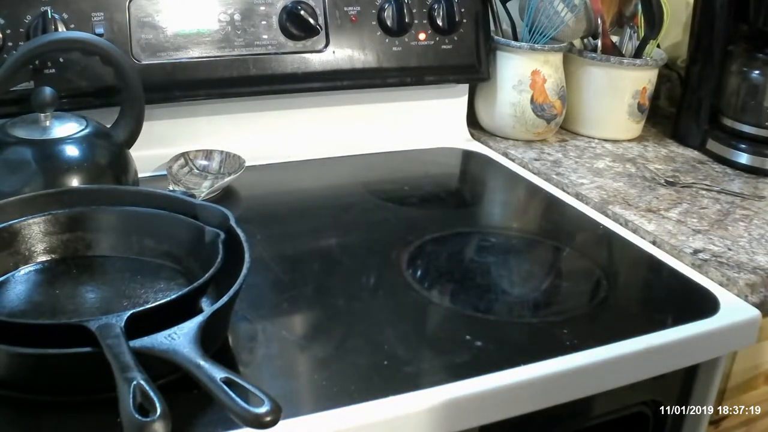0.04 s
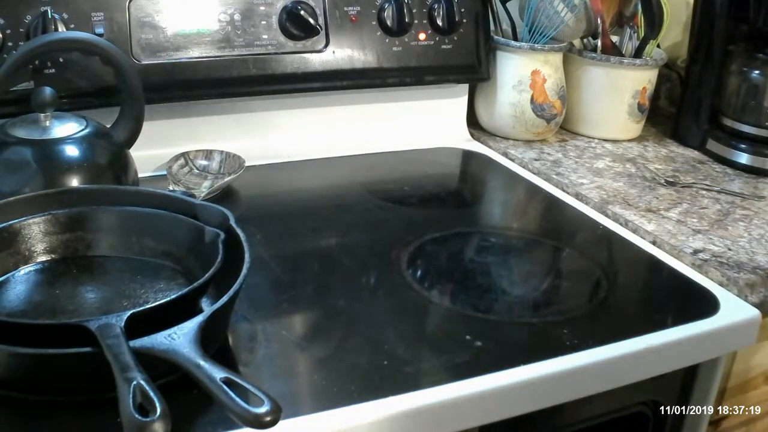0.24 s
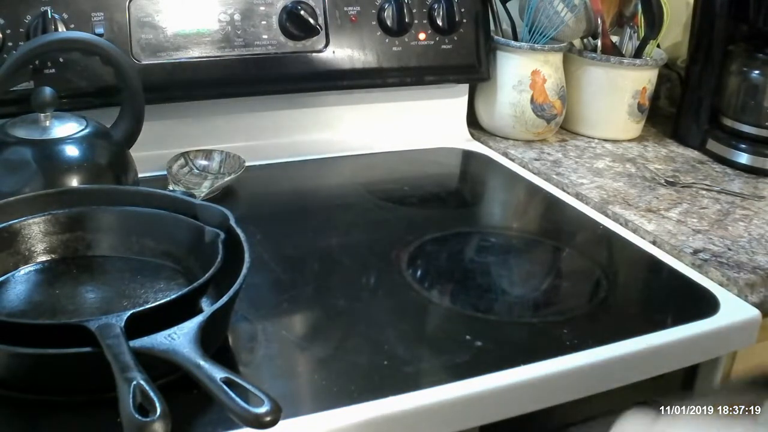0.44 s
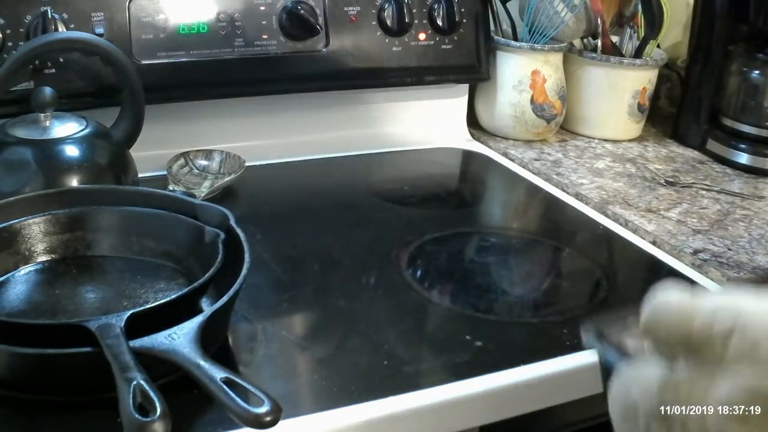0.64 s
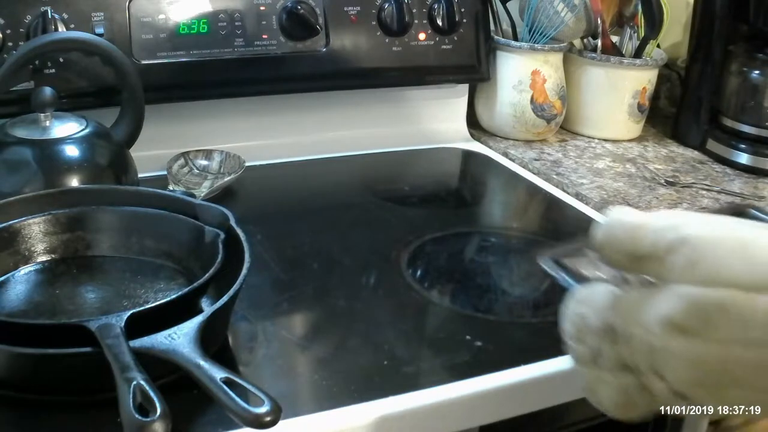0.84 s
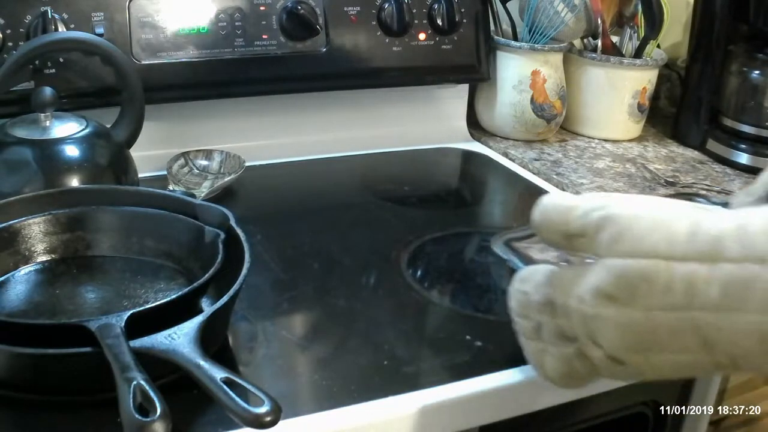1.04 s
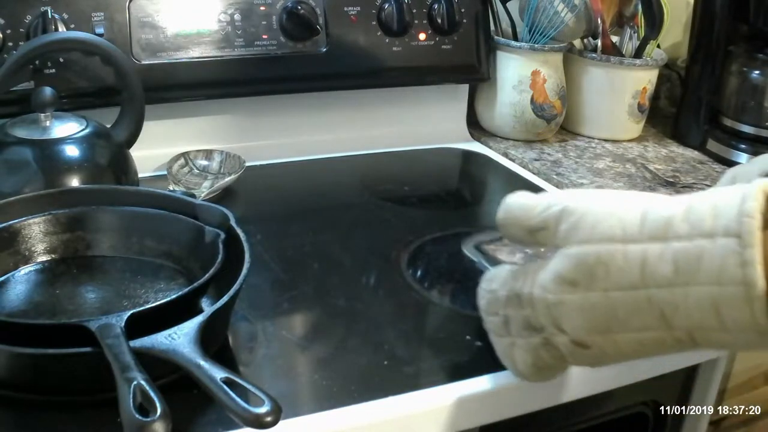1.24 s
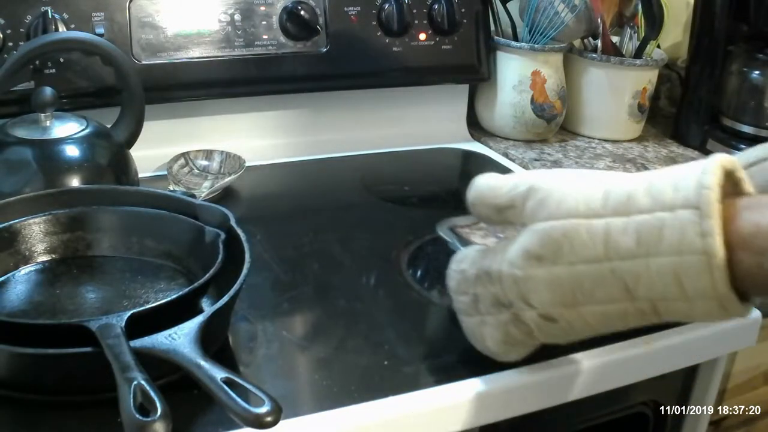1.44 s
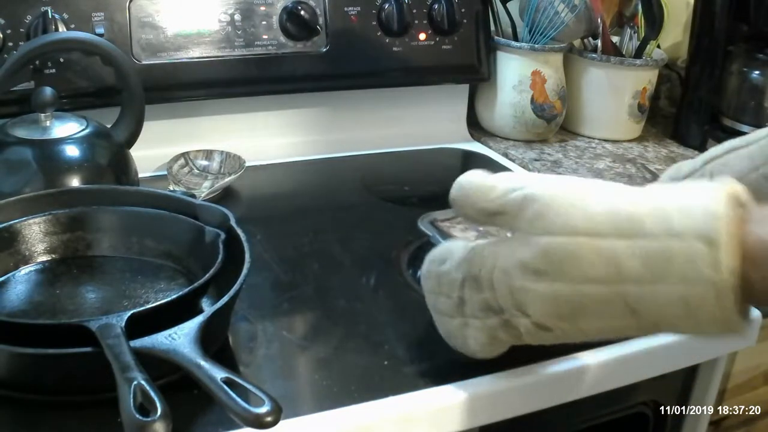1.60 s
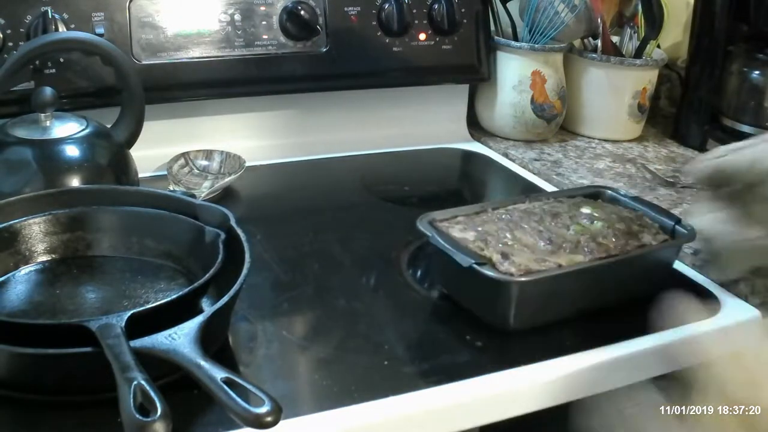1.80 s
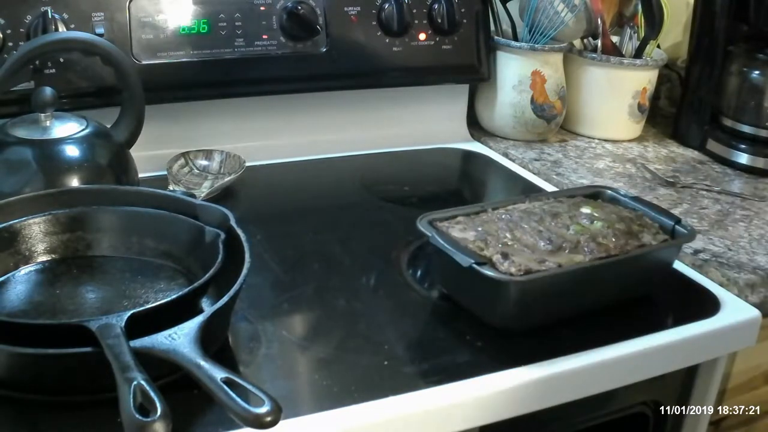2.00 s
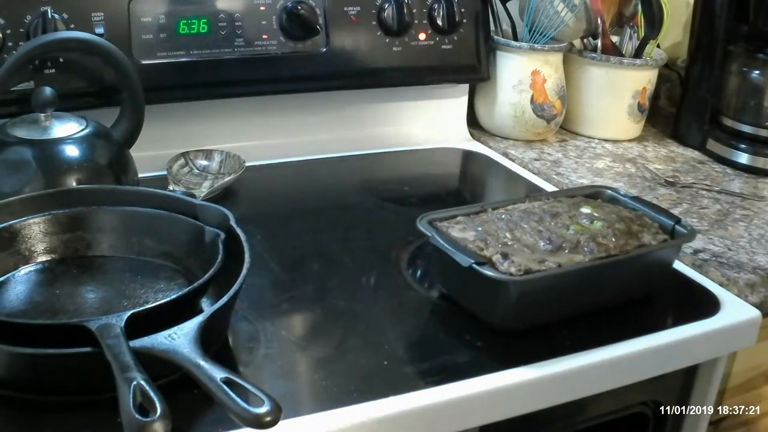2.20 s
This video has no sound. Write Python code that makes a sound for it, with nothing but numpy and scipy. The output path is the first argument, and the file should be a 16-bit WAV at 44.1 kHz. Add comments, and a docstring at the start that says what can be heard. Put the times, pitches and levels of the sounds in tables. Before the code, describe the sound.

A metal loaf pan clatters onto a glass cooktop over a steady fan hum.

```python
"""A fan hums steadily in a small kitchen; then a full metal loaf pan clatters onto a glass cooktop.
The pan judders on the glass with a duller knock as it is pushed into place, and the oven mitts
rub off it. Blows, slips and rubbing all excite the same ring of the pan, damped by the loaf."""
import sys
import numpy as np
from scipy import signal
from scipy.fft import rfft, irfft
from scipy.io import wavfile

SR = 44100
rng = np.random.default_rng(int(sys.argv[2]) if len(sys.argv) > 2 else 0)


def materialize(psi):
    """Save the field psi as 16-bit PCM at rate SR to the path in sys.argv[1].

    A 1-D psi becomes a single channel; in a 2-D psi each row is a channel.
    """
    bounded = np.clip(np.atleast_2d(psi).T, -1, 1)
    quanta = np.round(bounded * 32767).astype(np.int16)
    wavfile.write(sys.argv[1], SR, quanta)


N = 99489


# pan-on-glass contacts (time [s], level [dB], lowpass corner [Hz], cooktop thud [dB])
LANDING_BLOWS = [(1.1945, -6, 2900, 2), (1.199, -4.5, 2860, -5), (1.2051, -4.5, 1720, -17),
                 (1.2137, -13, 3670, 8)]

def landing():
    """The pan lands on one corner after another."""
    out = np.zeros(N)
    for start, db, corner_hz, thud_db in LANDING_BLOWS:
        add(out, start, amp(db) * contact(corner_hz, thud_db))
    return out


# pan modes, damped by the loaf (frequency [Hz], level [dB], t60 [s])
PAN_MODES = [(488.5, -34.5, 0.99), (585, -6.5, 0.084), (641.4, -4, 0.086), (668, -13.5, 0.072),
             (734, -15.5, 0.14), (798, -12.5, 0.055), (958, -18.5, 0.064), (1046, -24.5, 0.14),
             (1264, -23, 0.26), (1460, -33, .21), (1603, -30.5, .17), (1687, -14.5, 0.054),
             (2425, -31.5, 0.17), (2630, -31, 0.17)]
# cooktop modes (frequency [Hz], level [dB], t60 [s])
COOKTOP_MODES = [(113, -16, 0.32), (248, -16.5, 0.094), (268, -20.5, 0.096), (303.5, -16, 0.081),
                 (425, -15.5, 0.09)]
# dense sheet-metal modes (frequency [Hz], relative density [dB])
SHEET_SPECTRUM = [(200, -20), (450, 0), (700, 3.5), (900, -7.5), (1150, -10), (1600, -1.5), (2000, -16),
                  (2600, -8), (3600, -19), (5800, -35), (9000, -29.5), (16000, -29)]
# their decay (frequency [Hz], t60 [s])
SHEET_T60 = [(500, 0.33), (2500, 0.23), (5000, 0.26), (9000, .13)]

def contact(corner_hz, thud_db, sheet_db=-13):
    """One contact rings the pan and thumps the cooktop; a soft one loses its treble."""
    t = np.arange(SR // 2) / SR
    sheet = fade(colour(rng.standard_normal(len(t)), SHEET_SPECTRUM), SHEET_T60)
    hit = ring(PAN_MODES, t) + amp(sheet_db) * sheet + amp(thud_db) * ring(COOKTOP_MODES, t)
    return signal.lfilter(*signal.butter(1, corner_hz, fs=SR), hit)


# stick-slip bursts (start [s], length [s], slip rate [Hz], level [dB], cooktop thud [dB])
JUDDER_BURSTS = [(1.3966, .016, 280, -11.5, 2), (1.508, 0.0206, 284, -26.5, 3),
                 (2.141, .045, 266, -38, 16.5)]

def judders(growth_db=5.5, jitter_periods=0.042):
    """The base sticks and slips a few times, each slip harder, then stops: a hollow knock."""
    out = np.zeros(N)
    for start, length, rate_hz, db, thud_db in JUDDER_BURSTS:
        slip = contact(corner_hz=388, thud_db=thud_db, sheet_db=-14)  # softer than a blow
        ages = (np.arange(14) + jitter_periods * rng.standard_normal(14)) / rate_hz
        for age in ages[ages < length]:
            add(out, start + age, amp(db + growth_db * (age / length - 0.5)) * slip)
    return out


# strokes (start [s], rise [s], 20 dB release [s], level [dB], swell over rise [dB], pan ring [dB])
MITT_STROKES = [(1.43, 0.07, 0.11, -37.5, 0, 0), (1.692, 0.015, 0.037, -31, 14, -13),
                (1.715, 0.067, 0.087, -26, 12.5, -0.5), (2.121, 0.024, .05, -44, -4.5, -17),
                (1.886, 0.13, 0.86, -50.5, 7, -4)]
# friction hiss (frequency [Hz], relative density [dB])
FRICTION_SPECTRUM = [(100, -3), (250, -11), (450, -2.5), (750, 11), (1100, -4), (1600, 3), (2000, -5),
                     (2600, 1.5), (3500, -8.5), (5200, -18.5), (6500, -27.5), (15000, -42.5)]

def mitt_rubs(slips_per_s=9000, spread_db=0.5, onset_s=0.0085, ring_trim_db=-2):
    """Dense tiny slips of the mitts hiss and ring the pan; each stroke takes hold, then lets go."""
    out, t = np.zeros(N), np.arange(N) / SR
    slips = rng.standard_normal(N) * amp(spread_db * rng.exponential(1, N))
    slips *= rng.random(N) < slips_per_s / SR
    hiss = colour(slips, FRICTION_SPECTRUM)
    pan_ring = unit(signal.fftconvolve(slips, ring(PAN_MODES, t[:SR // 2]))[:N])
    for start, rise, release, db, swell_db, ring_db in MITT_STROKES:
        age = t - start
        onset = np.clip(age / onset_s, 0, 1)
        rise_db = swell_db * np.minimum(age / rise - 1, 0)
        release_db = -20 * np.maximum(age - rise, 0) / release
        out += onset * amp(db + rise_db + release_db) * (hiss + amp(ring_trim_db + ring_db) * pan_ring)
    return out


# fan and mains tones (frequency [Hz], steady part rms [dB], waver depth [ratio])
HUM_TONES = [(58.8, -66, .08), (161.4, -51.5, 0.083), (355.3, -36, 0.064), (479, -53, 1)]
# air rush (frequency [Hz], relative density [dB])
AIR_SPECTRUM = [(25, -25), (55, -39), (90, -22.5), (140, -9.5), (210, -10.5), (270, -3.5), (400, -1),
                (490, -3), (600, -5), (760, -7.5), (1100, -20), (1600, -15), (1950, -25.5), (2600, -20),
                (4000, -31), (6000, -34), (15500, -41.5)]

def fan(air_db=-42):
    """Wavering tones over a steady rush of air."""
    hum, t = np.zeros(N), np.arange(N) / SR
    for hz, db, depth in HUM_TONES:
        waver = (drift(rate_hz=3) + 1j * drift(rate_hz=7)) / np.sqrt(2)
        carrier = np.exp(2j * np.pi * (hz * t + rng.random()))
        hum += amp(db) * np.sqrt(2) * ((1 + depth * waver) * carrier).real
    return hum + amp(air_db) * colour(rng.standard_normal(N), AIR_SPECTRUM)


# room decay (frequency [Hz], t60 [s])
KITCHEN_T60 = [(150, 0.46), (500, 0.35), (1400, 0.32), (3700, 0.43), (10000, 0.43)]

def kitchen(x, level_db=-11, delay_s=0.011):
    """Diffuse reflections of the small room."""
    tail = fade(rng.standard_normal(SR // 2), KITCHEN_T60)
    out = np.zeros(N)
    add(out, delay_s, signal.fftconvolve(x, tail / np.linalg.norm(tail)))
    return amp(level_db) * out


def ring(modes, t):
    """Decaying modes after one blow."""
    return sum(amp(db - 60 * t / t60) * np.sin(2 * np.pi * hz * t) for hz, db, t60 in modes)


def fade(x, t60_table):
    """Decays each band of x at its own rate."""
    hz, t, bands = signal.stft(x, SR, nperseg=256)
    decay = amp(-60 * t / read(t60_table, hz)[:, None])
    return signal.istft(bands * decay, SR, nperseg=256)[1][:len(x)]


def colour(x, spectrum):
    """Filters x by a dB table, to rms 1."""
    hz = np.fft.rfftfreq(len(x), 1 / SR)
    return unit(irfft(rfft(x) * amp(read(spectrum, hz)), len(x)))


def drift(rate_hz):
    """Slow random motion, rms 1."""
    hz = np.fft.rfftfreq(N, 1 / SR)
    return unit(irfft(rfft(rng.standard_normal(N)) / (1 + (hz / rate_hz) ** 2), N))


def read(table, hz):
    """Interpolates a table on a log-frequency axis."""
    table_hz, value = np.transpose(table)
    return np.interp(np.log(hz + 1), np.log(table_hz + 1), value)


def add(mix, start_s, sound):
    """Mixes a sound in at start_s."""
    part = mix[round(start_s * SR):][:len(sound)]
    part += sound[:len(part)]


def amp(db):
    """Decibels to gain."""
    return 10 ** (np.asarray(db) / 20)


def unit(x):
    """Scales to rms 1."""
    return x / np.sqrt(np.mean(x ** 2) + 1e-20)


def scene():
    """The pan in the kitchen, with the fan behind it."""
    radiation = signal.butter(4, 232, "high", fs=SR, output="sos")  # a small pan radiates little bass
    pan = signal.sosfilt(radiation, landing() + judders() + mitt_rubs())
    return (pan + kitchen(pan) + fan())[None]


def record(dry, ceiling=1.8, cutoff_hz=15750):
    """Soft overload on the loudest blow, then a band limit."""
    rounded = ceiling * np.tanh(dry / ceiling)
    lowpass = signal.firwin(511, cutoff_hz, window=("kaiser", 9), fs=SR)
    return signal.oaconvolve(rounded, lowpass[None], "same")


dry = scene()
out = record(dry)
materialize(out)
```